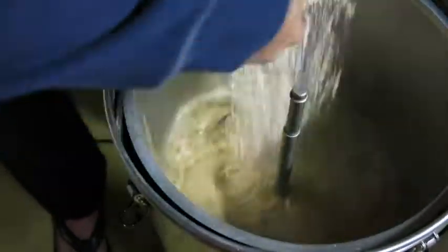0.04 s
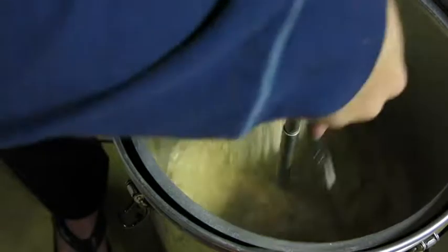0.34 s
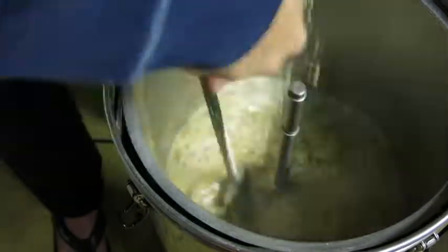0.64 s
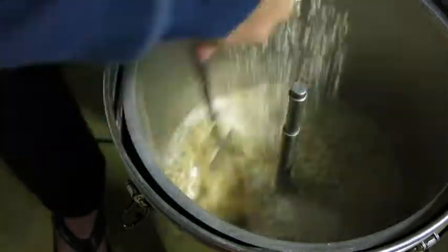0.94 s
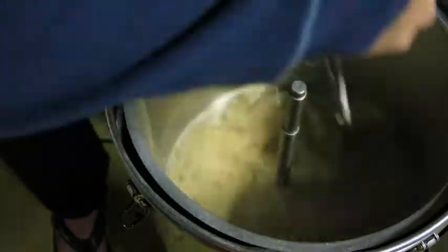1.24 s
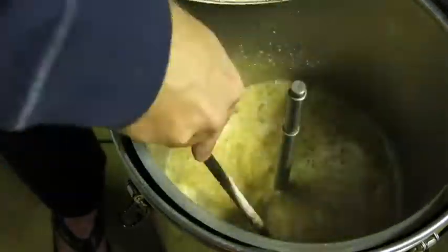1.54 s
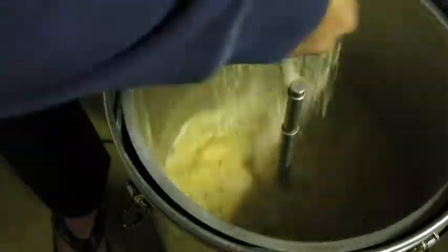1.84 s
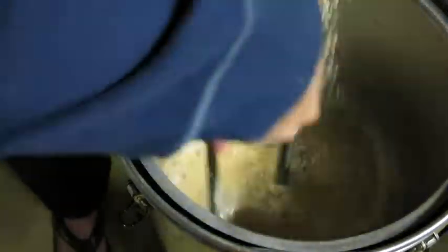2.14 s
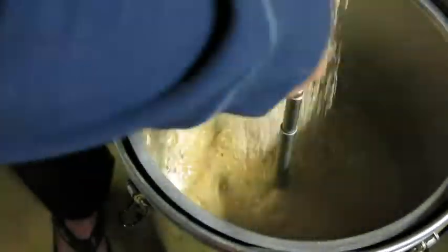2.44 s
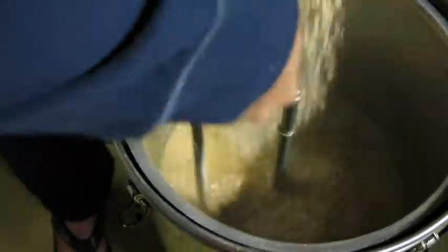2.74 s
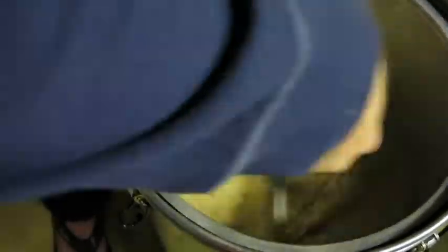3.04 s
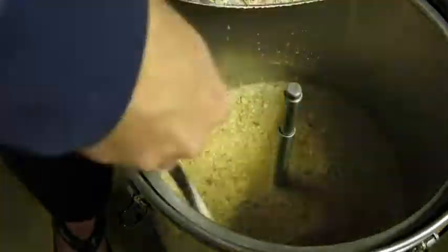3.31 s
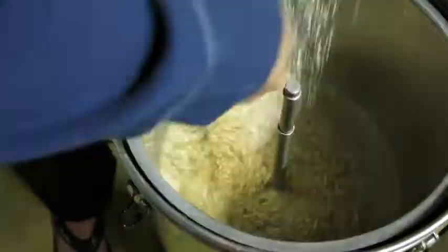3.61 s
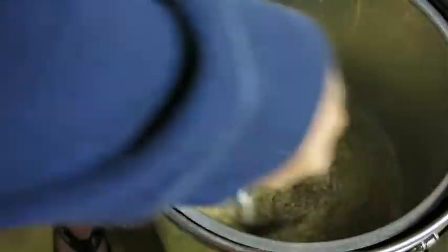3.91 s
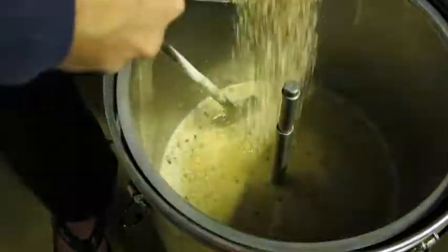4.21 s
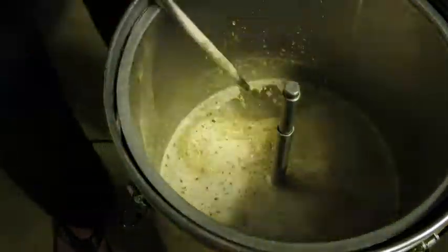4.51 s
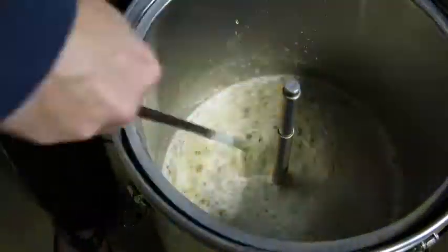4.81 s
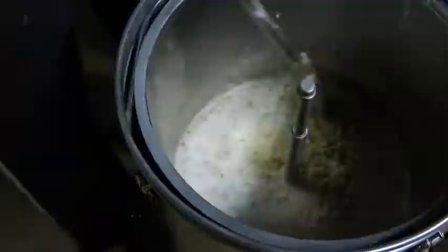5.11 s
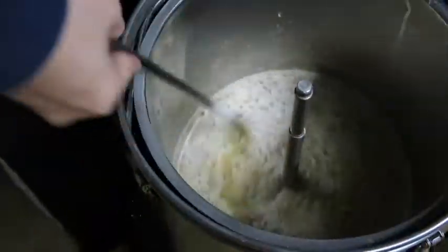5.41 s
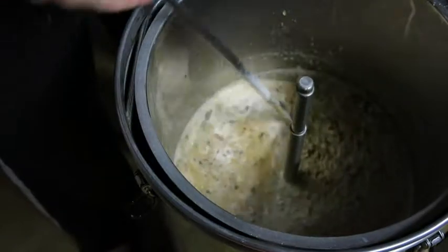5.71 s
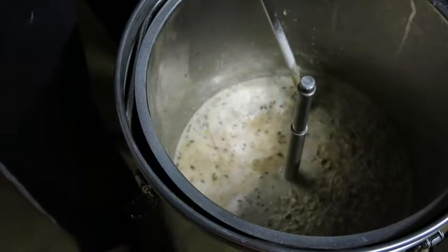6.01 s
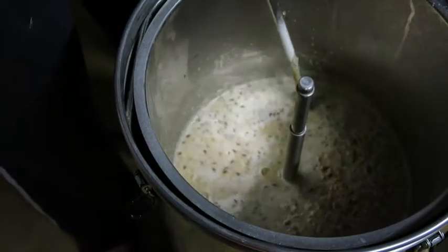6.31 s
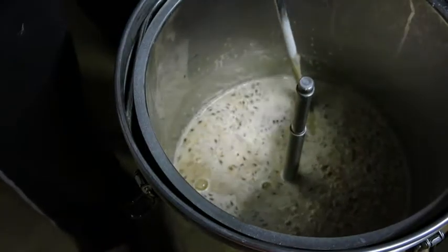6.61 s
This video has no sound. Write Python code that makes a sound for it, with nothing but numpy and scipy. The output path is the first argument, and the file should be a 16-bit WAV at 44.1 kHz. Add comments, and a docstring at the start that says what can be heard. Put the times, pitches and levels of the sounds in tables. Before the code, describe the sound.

From the start, crushed grain pours into water in a steel vessel, heard close and sped up as a high, resonant hiss. It is strongest in the first half second, then settles lower and holds steady. Over it a long spoon hits the wall in rapid, irregular bouts of short, bright pings, with dry ticks and small slops in between. The pings turn into light, even brushing around 2.7 to 3.3 seconds and are loudest from 3.4 to 4.1. A cluster of wet slops comes near 4.4, with three hard rim clacks between 4.4 and 4.8 and a few more clicks. At 5.2 seconds the hiss cuts off and the sound drops to normal speed: a steady machine hum resonates in the vessel, with soft, fizzy sloshing. The spoon gives a dull double clunk at 5.4 and another clunk near 6.1. The hum continues until about 6.7.

```python
"""Stirring grain into a steel mash vessel.

Crushed grain pours into water and a long spoon stirs it. At first time runs fast-forward: the pour
is a high hiss, and the spoon meets the wall once a turn in bouts of short, bright pings. Then, at
normal speed, a steady machine hum fills the vessel, the mash sloshes and the spoon clunks on the wall."""
import sys
import numpy as np
from scipy import signal
from scipy.fft import rfft, irfft, next_fast_len
from scipy.io import wavfile
from scipy.ndimage import uniform_filter1d

SR = 44100
rng = np.random.default_rng(int(sys.argv[2]) if len(sys.argv) > 2 else 0)


def persist_wave(psi):
    """Save psi, clipped to +-1, as 16-bit WAV."""
    counts = np.round(np.clip(psi, -1, 1) * 32767).astype(np.int16)
    wavfile.write(sys.argv[1], SR, np.atleast_2d(counts).T)


N = 297666
TIME_S = np.arange(N) / SR
NORMAL_SPEED_S = 5.2  # fast-forward ends

# Spoon on the wall, fast-forward: start_s, ring_db, crack_db
KNOCKS = [(0.0164, -29.5, -34), (0.0598, -33, -31), (0.098, -29, -29.5), (0.123, -28.5, -34),
          (0.144, -31.5, -28.5), (0.1919, -24, -36), (0.242, -23.5, -31.5), (0.353, -27, -37),
          (0.3792, -28.5, -30), (0.479, -38, -32), (0.5717, -33.5, -48), (0.592, -30, -42),
          (0.6115, -40, -32.5), (0.6179, -33.5, -32), (0.8209, -28.5, -33.5), (0.9794, -29, -37.5),
          (1.0379, -27.5, -35.5), (1.0842, -36, -34), (1.121, -33, -33), (1.1851, -32.5, -32),
          (1.2914, -29.0, -30.5), (1.341, -32, -32.5), (1.365, -35, -37), (1.4071, -40, -33.5),
          (1.575, -39, -50), (1.7395, -32, -34), (1.7861, -30.5, -34), (1.8412, -32, -35),
          (1.878, -34, -49), (1.8949, -28, -30), (1.9476, -41, -32), (1.977, -31.5, -40),
          (2.0053, -31.5, -36.5), (2.049, -34.5, -45), (2.056, -34, -31), (2.0997, -33, -31),
          (2.11, -29, -32.5), (2.1533, -35, -46), (2.1644, -28.5, -32), (2.1914, -34, -39),
          (2.215, -38, -37), (2.322, -34, -36.5), (2.411, -35, -28.5), (2.439, -21.5, -28.5),
          (2.5045, -28, -34), (2.5486, -28, -33), (2.594, -33, -33), (2.636, -33.5, -34),
          (2.8156, -33.5, -33), (2.946, -31, -33.5), (3.0358, -30.5, -37.5), (3.1684, -35, -36.5),
          (3.3694, -30, -36), (3.4281, -20.5, -26.5), (3.44, -29, -33), (3.4528, -40, -33),
          (3.4818, -19.5, -24), (3.5085, -28.5, -28.5), (3.5342, -26, -29.5), (3.5676, -32, -37),
          (3.599, -28.5, -32.5), (3.6078, -49, -31), (3.6783, -39, -34), (3.721, -30, -29),
          (3.779, -32.5, -34), (3.8296, -28.0, -33.5), (3.8624, -21, -27), (3.8893, -30, -33),
          (3.9439, -29.0, -34.5), (3.993, -30, -36.5), (4.0428, -30.5, -39), (4.087, -41, -31),
          (4.1211, -21, -29), (4.6163, -26.5, -26.5), (5.0742, -32.5, -29.5), (5.198, -32.5, -37.5)]
# Wall modes, fast-forward: pitch_hz, width_hz, thin_mash_db, thick_mash_db
WALL_MODES = [(2515, 59, -3, -10), (2532, 121, -6.5, -3), (4092, 190, 2, -9), (4243, 223, 0.5, 10.5),
              (4864, 335, 6.5, 0), (5490, 280, -3.5, -6), (8000, 240, 1, -2.5)]
# Mash thickness, 0-1: time_s, thickness
THICKNESS = [(1.5, 0.1), (2.5, 0.82), (3.4, 0.93), (4.6, 1)]
# Hard clacks on the rim: start_s, pitch_hz, ring_db, crack_db, crack_ms
CLACKS = [(4.441, 2840, -36.5, -40, 5), (4.712, 2960, -21.5, -28, 10), (4.7747, 3060, -30.5, -23.5, 2.4)]
# Rim modes: pitch_ratio, width_hz, level_db
RIM_MODES = [(0.53, 427, -13), (1.0, 487, 4.5), (1.65, 700, 1)]
# Snap of wall and rim contacts: freq_hz, level_db
CRACK_SPECTRUM = [(30, -4), (900, -2), (2000, -2.5), (2500, 5), (5500, 10), (9500, 4.5), (12500, 11.5),
                  (16000, 8)]
# Spoon on the wall, normal speed: start_s, ring_db, crack_db
CLUNKS = [(5.408, -32, -26), (5.438, -27, -29), (6.055, -24.5, -39), (6.066, -34, -40), (6.625, -61, -44.5)]
# Water-damped wall modes: pitch_hz, width_hz, level_db
CLUNK_MODES = [(566, 17.4, -2), (855, 70, 4), (927, 31, -5.5), (1213, 120, 0), (1656, 70, -4.5),
               (1970, 30, -5), (2320, 63, -9)]
# Snap of a clunk: freq_hz, level_db
CLUNK_SPECTRUM = [(30, -32), (500, -14), (2400, 5.5), (6400, -3), (7800, -15.5), (15000, -28)]
# Grain hiss envelope: time_s, level_db
POUR_LEVELS = [(0, -35), (0.4, -38.5), (0.75, -43), (1.3, -44), (1.52, -45), (2.1, -43), (5.15, -44.5)]
# Grain hiss: freq_hz, level_db
POUR_SPECTRUM = [(30, -4.5), (900, -6.5), (1900, -3.5), (2400, -1.5), (9500, 5), (12500, 6.5), (16000, 4.5)]
# Vessel resonances in the hiss, thin mash: centre_hz, width_hz, rush_db, later_db
POUR_PEAKS = [(1450, 560, 4, 7.5), (2596, 640, 17, 12.5), (3277, 130, 16.5, -8), (4010, 740, 7.5, 11.5),
              (4930, 440, 7.5, 8), (7450, 740, 8, 3)]
# Stereo width of the hiss: freq_hz, side_db
POUR_WIDTH = [(150, -48), (800, 6), (2500, -4.5), (15000, -4)]
# Mash slopping round the spoon: start_s, level_db
SLOPS = [(0.886, -43.5), (1.662, -45.5), (1.877, -45), (2.587, -43.5), (3.022, -47), (4.408, -38.5),
         (4.414, -36), (4.431, -42), (4.448, -40.5), (4.465, -43.5), (4.484, -36)]
# Air modes above the mash: pitch_hz, width_hz, level_db
HOLLOW_MODES = [(1495, 280, 0.5), (2715, 360, 1)]
# Dry ticks: start_s, level_db, decay_ms
TICKS = [(0.915, -36.5, 2.9), (1.483, -43.5, 2.2), (1.694, -37.5, 6.4), (1.767, -36, 13), (2.649, -43, 2.2),
         (2.898, -37.5, 1.5), (3.022, -34.5, 1.2), (3.706, -32.5, 16), (4.5825, -37, 1.5),
         (4.588, -39.5, 2), (4.6, -36, 15), (4.677, -36, 3.8), (4.955, -32.5, 20), (4.968, -31.5, 1.9),
         (4.975, -30.5, 2.1)]
# Broadband ticks and splashes: freq_hz, level_db
TICK_SPECTRUM = [(400, -1.5), (5000, 8.5), (16000, -0.5)]
# Background envelopes, normal speed: time_s, hum_db, slosh_db
BACKGROUND_LEVELS = [(5.25, -39, -47), (5.416, -37, -43.5), (6.75, -38.5, -50)]
# Stirred mash: freq_hz, level_db
SLOSH_SPECTRUM = [(200, -33), (1500, 15), (5500, -3.5), (8000, -9), (16000, -15)]
# Machine hum: freq_hz, level_db
HUM_SPECTRUM = [(25, -23), (70, -9), (200, 1.5), (1700, -1.5), (2400, -7), (3200, -25.5), (16000, -28)]
# Vessel resonances in the hum: centre_hz, width_hz, gain_db
HUM_PEAKS = [(197, 52, 6), (288.6, 29, 12), (344, 26, 8), (625, 100, 5.5), (807, 62, 7.5),
             (1241, 176, 14.5), (1600, 400, 4)]
# Stereo width of the hum: freq_hz, side_db
HUM_WIDTH = [(100, 13), (230, 2), (1300, -7), (8000, 2)]


def knocks(push_ms=3.45, crack_ms=4.34, skid_lead_s=0.0068, skid_db=-18, skid_chance=0.3):
    """The spoon knocks on the wall; now and then it skids, touching lightly first."""
    out = np.zeros((2, N))
    for start_s, ring_db, crack_db in KNOCKS:
        hardness, skid_draw, gap = rng.uniform(0, 1, 3)
        linger = undb(0.26 * (ring_db - crack_db))  # more crack than ring: shorter contact
        touch = 4 * hardness ** 2 - 1
        modes = wall_modes(start_s)
        add(out, start_s, ring(contact(push_ms * linger, touch=touch), modes, ring_db))
        add(out, start_s, crack(crack_ms * linger, crack_db, CRACK_SPECTRUM, touch=touch))
        if skid_draw < skid_chance:
            skid_s = start_s - skid_lead_s * (1 + gap / 2)
            add(out, skid_s, ring(contact(1), modes, ring_db + skid_db))
    return out


def brushing(first_s=2.68, turns=14, turn_s=0.0443, mean_db=-38):
    """Even stirring: the spoon brushes the wall once a turn."""
    out = np.zeros((2, N))
    for turn, level_db in enumerate(mean_db + rng.standard_normal(turns)):
        start_s = first_s + turn * turn_s
        add(out, start_s, ring(contact(1.8), wall_modes(start_s), level_db))
        add(out, start_s, crack(8.5, level_db - 0.5, CRACK_SPECTRUM))
    return out


def clunks(room_db=-3, room_ms=23):
    """The spoon hits the water-damped wall; the room answers briefly."""
    out = np.zeros((2, N))
    for start_s, ring_db, crack_db in CLUNKS:
        push = contact(6, size=16384)
        add(out, start_s, ring(push, CLUNK_MODES, ring_db, side_db=-7, vary=0.48))
        add(out, start_s, crack(6.8, crack_db, CLUNK_SPECTRUM, touch=5.1))
        room = crack(room_ms, crack_db + room_db, CLUNK_SPECTRUM, side_db=-7, size=16384, shape=1)
        add(out, start_s, room)
    return out


def rim_clacks():
    """Hard blows on the rim; a longer contact favours the low modes."""
    out = np.zeros((2, N))
    for start_s, pitch_hz, ring_db, crack_db, crack_ms in CLACKS:
        tilt_db_per_oct = -4 * np.log2(crack_ms / 3)
        modes = [(ratio * pitch_hz, width_hz, mode_db + tilt_db_per_oct * np.log2(ratio))
                 for ratio, width_hz, mode_db in RIM_MODES]
        add(out, start_s, ring(contact(crack_ms / 2), modes, ring_db))
        add(out, start_s, crack(crack_ms, crack_db, CRACK_SPECTRUM, touch=2.1))
    return out


def pour(churn_db=2, rush_end_s=0.93, fade_s=0.044, calm_share=0.8, rise=0.042, swell=0.27, drift=0.02):
    """Grain hisses onto the mash; vessel resonances flicker and rise as the mash thickens."""
    freq_hz, frame_s, spectra = signal.stft([grains(), grains()], SR, nperseg=1024)
    freq_hz = freq_hz[:, None] + 1
    settled = 0.5 + 0.5 * np.tanh((frame_s - rush_end_s) / fade_s)  # 0 in the first rush, then 1
    drive = calm_share + (1 - calm_share) * churn(frame_s)
    shape_db = spectrum_db(freq_hz, POUR_SPECTRUM)
    for thin_hz, width_hz, rush_db, later_db in POUR_PEAKS:
        flicker, detune = (np.interp(frame_s, TIME_S, wander(35)) for _ in range(2))
        peak_db = (1 - settled) * rush_db + settled * later_db * drive * (1 + swell * flicker)
        centre_hz = thin_hz * (1 + rise * thickness(frame_s) + drift * settled * detune)
        shape_db = shape_db + resonance_db(freq_hz, centre_hz, width_hz, peak_db)
    power = uniform_filter1d(np.mean(undb(shape_db) ** 2, axis=0), size=15)
    gain = undb(shape_db + churn_db * churn(frame_s)) / np.sqrt(power)
    mid, side = signal.istft(spectra * gain, SR)[1][:, :N]
    return stereo(mid, colour(side, POUR_WIDTH)) * undb(curve(POUR_LEVELS) + wander(40))


def slops(decay_ms=4.2):
    """Mash slops round the spoon: the hollow above rings, with a splash."""
    out = np.zeros((2, N))
    for start_s, level_db in SLOPS:
        add(out, start_s, ring(contact(decay_ms), HOLLOW_MODES, level_db))
        add(out, start_s, crack(decay_ms, level_db, TICK_SPECTRUM))
    return out


def ticks():
    """Dry broadband contacts, no ring."""
    out = np.zeros((2, N))
    for start_s, level_db, decay_ms in TICKS:
        add(out, start_s, crack(decay_ms, level_db, TICK_SPECTRUM))
    return out


def patter(count=70, spread_db=3, push_ms=3.6, stray_s=0.022, bubble_hz=8800, bubbles_end_s=4.1):
    """Light spoon taps near the knocks; scattered small slops, splashes and bubbles."""
    out = np.zeros((2, N))
    for when, scatter in zip(rng.uniform(0, 1, (count, 4)), rng.standard_normal((count, 6))):
        tap_db, slop_db, splash_db, bubble_db = spread_db * scatter[:4] + [-47, -58, -51, -50]
        detune, stray = scatter[4:]
        knock_s = KNOCKS[int(when[0] * len(KNOCKS))][0]
        tap_s = knock_s + stray_s * np.tanh(2 * stray)
        bubble_s = bubbles_end_s * when[1]
        slop_s, splash_s = NORMAL_SPEED_S * when[2:]
        bubble_mode = (bubble_hz * (1 + 0.05 * detune), 120, 0)
        add(out, tap_s, ring(contact(push_ms), wall_modes(tap_s), tap_db))
        add(out, slop_s, ring(contact(push_ms), HOLLOW_MODES, slop_db, side_db=16.5))
        add(out, splash_s, crack(2.4, splash_db, TICK_SPECTRUM, side_db=10.5))
        add(out, bubble_s, ring(contact(push_ms), [bubble_mode], bubble_db, side_db=-6))
    return out


def slosh():
    """Wet fizz of the stirred mash."""
    mid, side = (unit_rms(colour(grains(), SLOSH_SPECTRUM)) for _ in range(2))
    return stereo(mid, 0.34 * side) * undb(curve(BACKGROUND_LEVELS, column=2) + wander(9.2))


def hum():
    """Steady machine noise resonating in the vessel."""
    mid, side = (unit_rms(colour(rng.standard_normal(N), HUM_SPECTRUM, HUM_PEAKS)) for _ in range(2))
    return stereo(mid, colour(side, HUM_WIDTH)) * undb(curve(BACKGROUND_LEVELS) + 0.5 * wander(24))


def thickness(time_s):
    """Mash thickness, 0-1."""
    return np.interp(time_s, *np.transpose(THICKNESS))


def churn(time_s, linger_s=0.041):
    """Stirring effort, 0-1: high in a bout of knocks, nil in the pauses."""
    return np.tanh(sum(np.exp(-((time_s - knock_s) / linger_s) ** 2) for knock_s, _, _ in KNOCKS))


def wall_modes(time_s):
    """Wall modes, reweighted as the mash thickens."""
    return [(pitch_hz, width_hz, thin_db + thickness(time_s) * (thick_db - thin_db))
            for pitch_hz, width_hz, thin_db, thick_db in WALL_MODES]


def contact(decay_ms, size=4096, shape=1.5, touch=1.5):
    """Rough contact: a first touch, then lumpy chatter; shape over 1 ends it abruptly."""
    time_ms = 1000 * np.arange(size) / SR
    first_touch = 1 + touch * np.exp(-time_ms / 0.3)
    lumps = undb(3 * np.interp(time_ms, np.arange(64) * 0.7, rng.standard_normal(64)))
    decay = np.exp(-(time_ms / max(decay_ms, 0.1)) ** shape)
    return rng.standard_normal(size) * lumps * first_touch * decay


def crack(decay_ms, level_db, spectrum, side_db=-10.5, size=2048, shape=1.4, touch=1.5):
    """Direct snap of a contact, different at each ear."""
    pushes = [np.pad(contact(decay_ms, size, shape, touch), (16, 240)) for _ in range(2)]
    mid, side = (at_level(colour(push, spectrum)[:size], level_db) for push in pushes)
    return stereo(mid, undb(side_db) * side)


def ring(push, modes, level_db, side_db=-15, vary=1):
    """Modes driven by a contact; each blow lands elsewhere and weights them anew."""
    time_s = np.arange(len(push)) / SR
    mid = side = 0
    for pitch_hz, width_hz, mode_db in modes:
        weight, detune, pan = rng.standard_normal(3)
        envelope = time_s * np.exp(-np.pi * width_hz * time_s)  # builds up, then decays
        mode = envelope * np.sin(2 * np.pi * pitch_hz * (1 + 0.011 * detune) * time_s)
        tone = at_level(irfft(rfft(push) * rfft(mode)), mode_db + 3.6 * vary * weight)
        mid, side = mid + tone, side + pan * tone
    return stereo(at_level(mid, level_db), at_level(side, level_db + side_db))


def grains(spread_db=2):
    """Dense tiny contacts, their size scattering every millisecond."""
    return unit_rms(rng.standard_normal(N) * undb(spread_db * wander(1000)))


def wander(rate_hz):
    """Random drift, RMS 1."""
    knots_s = np.arange(0, N / SR + 1, 1 / rate_hz)
    return unit_rms(np.interp(TIME_S, knots_s, rng.standard_normal(len(knots_s))))


def colour(x, spectrum, peaks=()):
    """Filter by a spectrum plus resonances."""
    size = next_fast_len(len(x))
    freq_hz = np.arange(size // 2 + 1) * SR / size
    gain_db = spectrum_db(freq_hz + 1, spectrum) + sum(resonance_db(freq_hz, *peak) for peak in peaks)
    return irfft(rfft(x, size) * undb(gain_db), size)[:len(x)]


def spectrum_db(freq_hz, spectrum):
    knots_hz, knots_db = np.transpose(spectrum)
    return np.interp(np.log(freq_hz), np.log(knots_hz), knots_db)


def resonance_db(freq_hz, centre_hz, width_hz, peak_db):
    return peak_db / (1 + (2 * (freq_hz - centre_hz) / width_hz) ** 2)


def curve(rows, column=1):
    columns = np.transpose(rows)
    return np.interp(TIME_S, columns[0], columns[column])


def at_level(x, level_db, window_s=0.012):
    """Scale to the energy of level_db held for window_s."""
    return x * undb(level_db) / np.sqrt(np.sum(x ** 2) / (window_s * SR))


def add(out, start_s, sound):
    start = int(np.clip(start_s * SR, 0, N - 1))
    out[:, start:start + sound.shape[1]] += sound[:, :N - start]


def stereo(mid, side):
    return np.array([mid + side, mid - side])


def unit_rms(x):
    return x / np.sqrt(np.mean(x ** 2))


def undb(level_db):
    return 10 ** (np.asarray(level_db) / 20)


def scene(crossfade_s=0.012):
    """Fast-forward pouring and stirring, then stirring at normal speed."""
    normal = np.clip((TIME_S - NORMAL_SPEED_S) / crossfade_s, 0, 1)
    fast_hits = knocks() + brushing() + rim_clacks() + slops() + ticks()
    return fast_hits + (1 - normal) * (pour() + patter()) + normal * (hum() + slosh()) + clunks()


def record(dry):
    """Steep low-pass at the top of the treble."""
    cutoff_hz = 15850
    return signal.sosfilt(signal.ellip(10, 0.2, 70, cutoff_hz, fs=SR, output="sos"), dry)


dry = scene()
out = record(dry)
persist_wave(out)
```